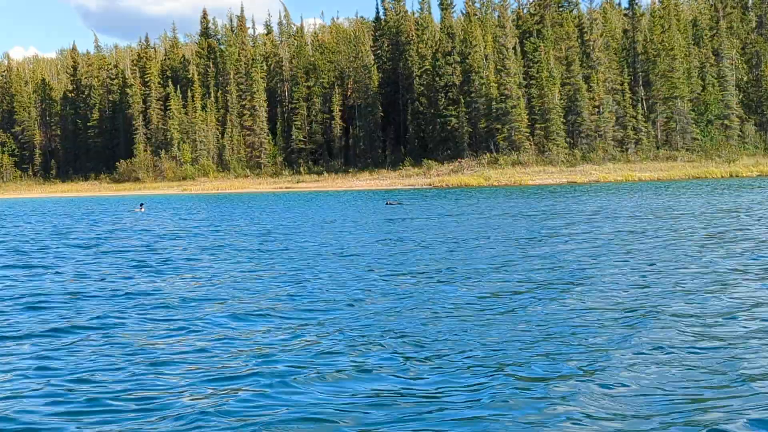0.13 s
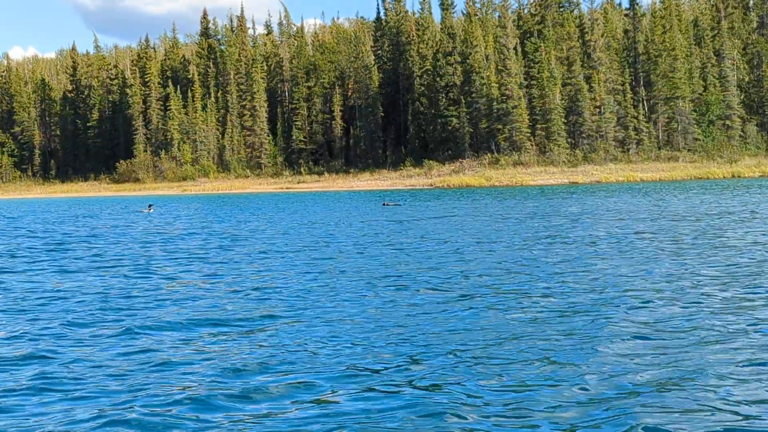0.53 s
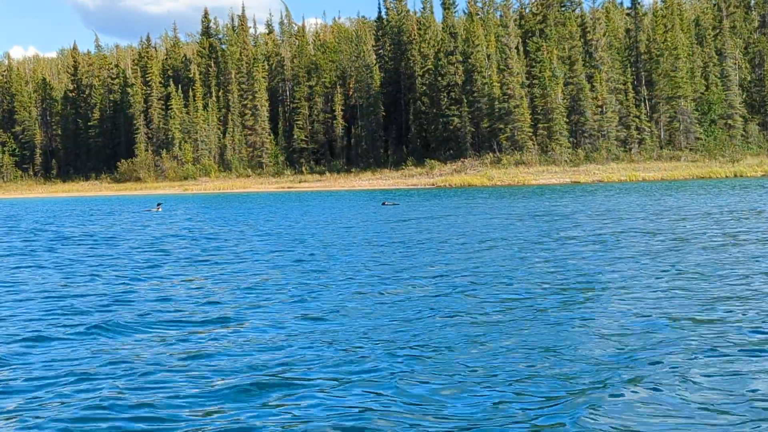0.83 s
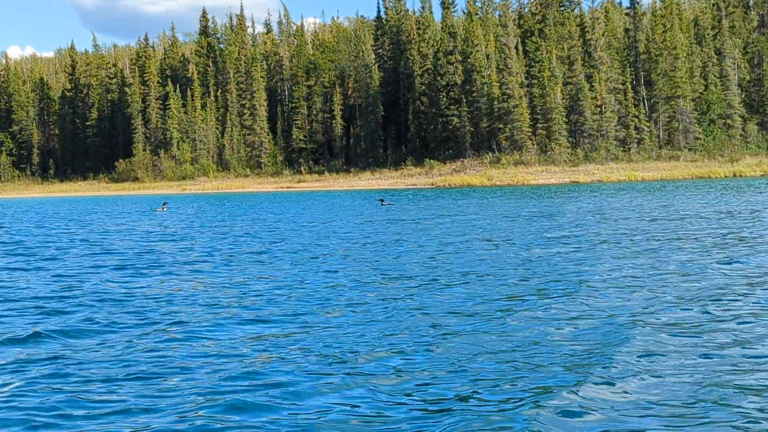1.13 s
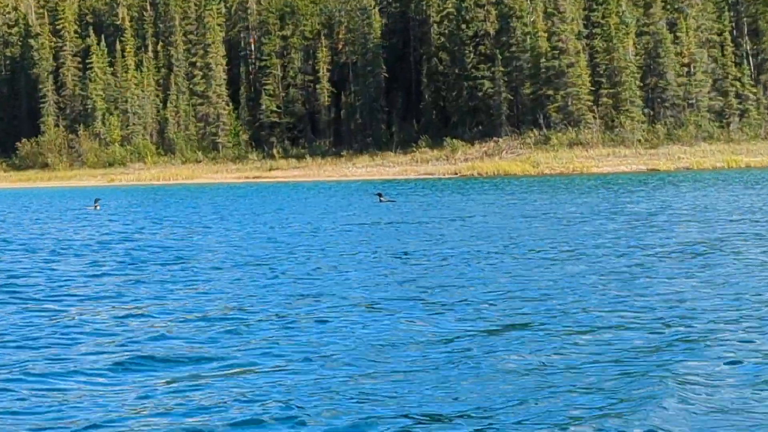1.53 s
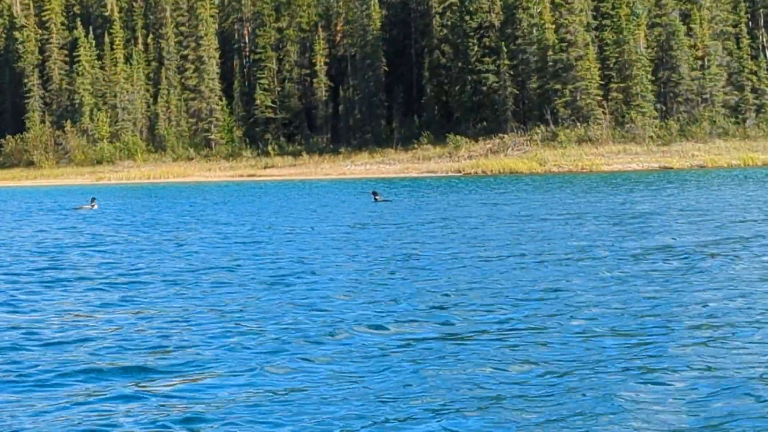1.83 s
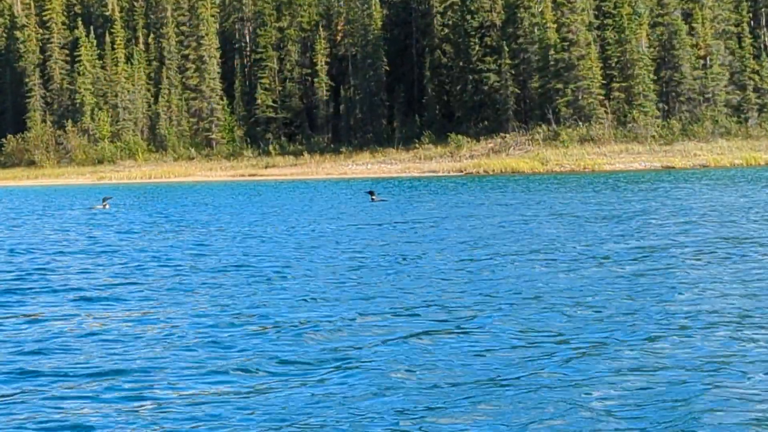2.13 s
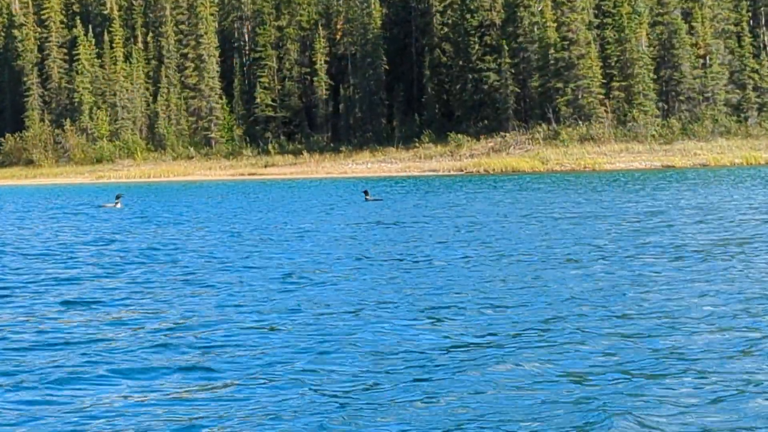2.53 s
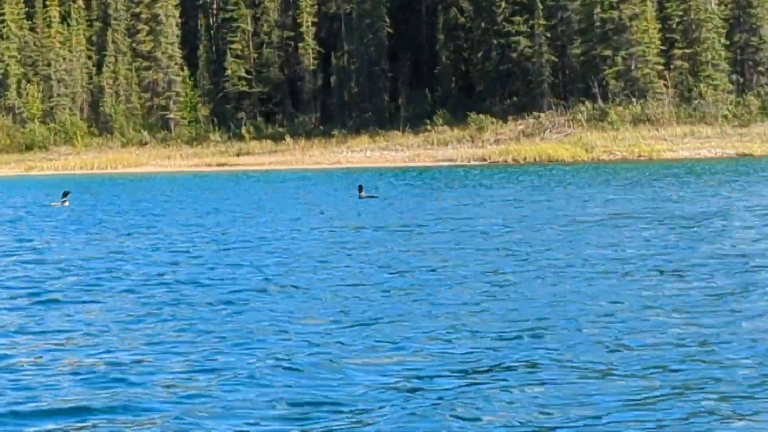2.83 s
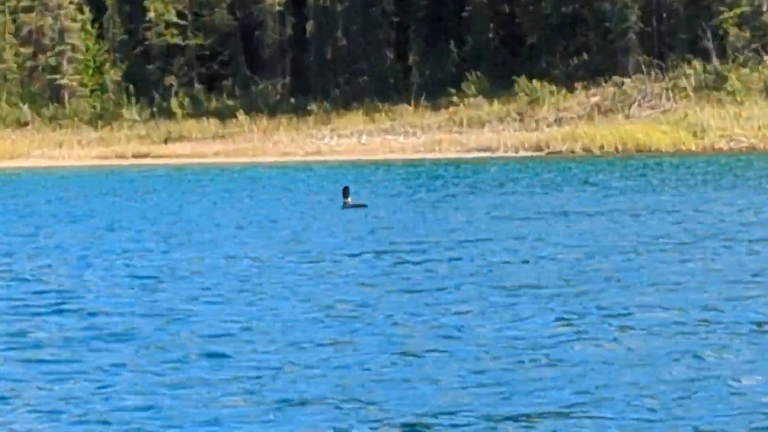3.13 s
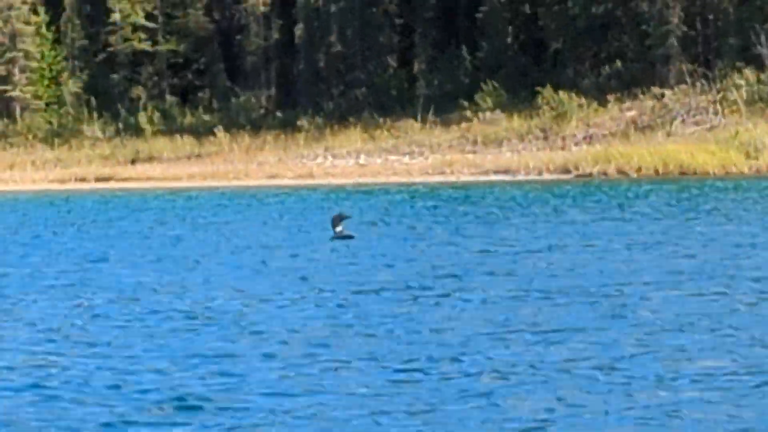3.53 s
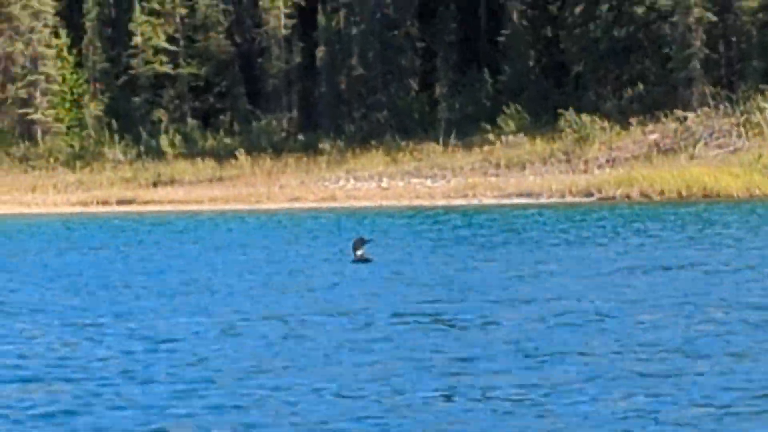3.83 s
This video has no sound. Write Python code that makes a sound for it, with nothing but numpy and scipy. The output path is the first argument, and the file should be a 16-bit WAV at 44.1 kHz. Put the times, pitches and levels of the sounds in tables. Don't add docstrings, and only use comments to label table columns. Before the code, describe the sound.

Loon tremolo calls, three quick quavering bursts, echo faintly from trees amid low wind thumps and water plops.

```python
import sys
import numpy as np
from scipy import signal
from scipy.fft import rfft, irfft
from scipy.io import wavfile

SR = 44100
rng = np.random.default_rng(int(sys.argv[2]) if len(sys.argv) > 2 else 0)


def attenuation_scalar(level_db):
    decades = np.asarray(level_db, float) / 20
    return 10 ** decades


def transcribe(u):
    v = np.clip(np.atleast_2d(u).T, -1, 1)
    q = np.round(v * 32767).astype(np.int16)
    wavfile.write(sys.argv[1], SR, q)


N = 176400

# t/s, left level/dB, right level/dB
BREEZE = [(0, -46, -33.5), (.7, -45, -49), (1.2, -50.5, -59.5), (1.5, -50.5, -57), (1.85, -55, -37),
          (2.15, -44, -50), (2.6, -51.5, -56), (3.1, -45, -33.5), (3.5, -44, -51), (4, -48, -39)]
# f/Hz, density/dB per Hz
BREEZE_SPECTRUM = [(22, -31.5), (55, -5.5), (110, -1), (200, -7), (350, -22), (700, -41.5), (2500, -75.5)]
# start t/s, end t/s, level/dB
LEFT_GUSTS = [(.165, .2, -36), (.705, .76, -37.5), (1.0, 1.15, -45), (1.33, 1.4, -51.5), (1.5, 1.62, -48.5),
              (2.1, 2.3, -66), (2.6, 2.7, -45.5), (3.105, 3.14, -40), (3.24, 3.35, -41.5),
              (3.52, 3.8, -37.5), (3.86, 3.92, -39.5)]
RIGHT_GUSTS = [(0.015, 0.1, -32), (0.126, 0.192, -40.5), (0.285, 0.378, -30.5), (0.413, 0.514, -31.5),
               (0.512, 0.674, -44), (1.661, 1.778, -40), (1.771, 1.945, -37.5), (1.939, 1.994, -45),
               (2.928, 3.063, -44.5), (3.092, 3.196, -33.5), (3.19, 3.276, -38.5), (3.317, 3.385, -43.5),
               (3.582, 3.768, -43), (3.728, 3.941, -34.5), (3.943, 4.01, -36)]
# f/Hz, density/dB per Hz
GUST_SPECTRUM = [(15, -30), (25, -4.5), (86, 1), (337, -4), (687, -20.5), (1180, -34.5), (2500, -65.5),
                 (3250, -84), (5500, -120)]
# t/s, peak level/dB
LEFT_SLAPS = [(0.178, -41), (0.192, -39), (0.491, -38.5), (0.611, -41.5), (0.712, -33.5), (0.73, -38),
              (3.123, -42.5), (3.25, -39.5), (3.273, -37.5), (3.315, -40.5), (3.345, -37), (3.438, -41.5),
              (3.496, -43.5), (3.541, -34), (3.57, -35.5), (3.627, -41.5), (3.641, -34.5), (3.746, -37),
              (3.763, -40), (3.78, -40.5), (3.882, -33.5), (3.905, -38)]
RIGHT_SLAPS = [(0.036, -24), (0.06, -27), (0.091, -34.5), (0.171, -25), (0.185, -34.5), (0.3, -33),
               (0.322, -24), (0.353, -26.5), (0.427, -29.5), (0.442, -30.5), (0.455, -26), (0.468, -33),
               (0.477, -34), (0.498, -31), (1.869, -34), (1.881, -35.5), (1.937, -34.5), (3.097, -36),
               (3.108, -35.5), (3.118, -38), (3.128, -30.5), (3.137, -30.5), (3.149, -24), (3.169, -25),
               (3.181, -34.5), (3.204, -32), (3.733, -34), (3.75, -31.5), (3.767, -33), (3.785, -34),
               (3.849, -32.5), (3.869, -32.5), (3.884, -31.5), (3.927, -30)]
# f/Hz, density/dB per Hz
SLAP_SPECTRUM = [(40, -20.5), (120, -4), (300, 0), (600, -14), (1200, -36), (2500, -62.5), (5000, -100)]
# t/s, level/dB
WASH_LEVEL = [(0, -88), (.5, -84), (.6, -78), (.75, -81.5), (.85, -86), (1.7, -82.5), (2.6, -80.5),
              (3.4, -78.5), (4, -86)]
# f/Hz, density/dB per Hz
WASH_SPECTRUM = [(500, -11.5), (1200, -20), (2000, -10.5), (4500, -19.5), (6200, -19), (7500, -22.5),
                 (12000, -27), (15700, -31)]
# t/s, f/Hz, level/dB, relative pitch rise/(1/s)
PLOPS = [(.565, 1086, -69.5, -1.5), (.625, 2260, -74.5, 1.3), (0.627, 1710, -78, .5), (.645, 822, -76, .5),
         (.72, 1423, -81, 0), (.6, 1067, -79, 0.5), (.628, 2650, -79, 0), (.655, 1440, -82, 0.5),
         (.9, 1143, -76.5, -0.5), (.9, 640, -68, 1.5), (1.175, 1770, -68, -3.5), (.876, 1166, -68, -1.5),
         (.878, 593, -63, 2.5), (1.008, 1060, -76, 8.5), (1.025, 800, -73, 7), (1.085, 1160, -84, 10.5),
         (2.488, 1810, -64, 0), (3.189, 1995, -72, 5), (3.415, 2210, -68.5, 5), (3.416, 1720, -74.5, 3.5)]
# start t/s, end t/s, level/dB
FIZZES = [
    (0.227, .29, -81),
    (0.562, 0.673, -80),
    (0.661, .74, -80.5),
    (.74, .82, -86.5),
    (3.34, 3.36, -89),
    (3.433, 3.46, -87),
    (3.536, 3.62, -88.5),
]
# f/Hz, density/dB per Hz
FIZZ_SPECTRUM = [(3000, -16), (4800, -15), (6200, 3), (7200, -5), (10000, -7), (11500, -2), (12500, -9),
                 (15700, -15)]
# f/Hz, density/dB per Hz
SCRATCH_SPECTRUM = [(880, -40), (1500, -13), (1810, -9), (2230, -13), (2800, -14.5), (4590, -17),
                    (6630, -11), (11300, -5.5), (14000, -2.5), (16000, -7.5)]
# crest t/s, top f/Hz, level/dB, split lines level/dB
THROBS = [(1.137, 756, -50, -59.5), (1.243, 856, -39, -60.5), (1.239, 1190, -39.5, -27.5),
          (1.34, 1230, -31.5, -29.5), (1.444, 1170, -34, -58.5), (1.538, 632, -61.5, -72),
          (1.788, 787.5, -50, -57.5), (1.886, 924, -37, -64), (1.878, 1290, -34, -20),
          (1.982, 1290, -33, -65.5), (2.086, 1288, -32.5, -64.5), (2.196, 792.5, -47.5, -62),
          (2.544, 767.4, -45, -57), (2.626, 880, -33.5, -72), (2.633, 1220, -32.5, -18.5),
          (2.726, 1253, -27.5, -24), (2.825, 1223, -27.5, -23), (2.93, 1118, -34.5, -56),
          (2.999, 648, -57.5, -52)]
# start t/s, end t/s, f between throbs/Hz, overtones level/dB, throat peak f/Hz
PHRASES = [
    (1.094, 1.24, 661.5, -3, 4270),
    (1.239, 1.517, 943, -1.1, 4170),
    (1.506, 1.628, 624, -8, 4600),
    (1.763, 1.882, 675, 7, 5920),
    (1.879, 2.164, 978, 4.5, 6220),
    (2.162, 2.265, 654, 4, 5700),
    (2.507, 2.614, 675, -2, 4300),
    (2.612, 2.999, 952.5, 5.5, 4440),
    (2.981, 3.016, 621, -11.5, 4600),
]
HEAD_PARTIALS_DB = [1.5, -26.5]
CHEST_PARTIALS_DB = [0, 4, -17.5]
# thirds of the pitch, level/dB
SPLIT_LINES = [(2, -0.5), (4, 0.5), (5, 2), (11, -18)]
# f/Hz, level/dB
AIR_SPECTRUM = [(1500, 4.5), (3000, 2), (5000, -5.5), (7500, -12.5), (14000, -15.5), (15700, -18.5),
                (15900, -61.5)]
# f/Hz, width/Hz, depth/dB
THROAT_DIPS = [(1900, 61, 2), (3100, 390, 11.5)]

TIME_S = np.arange(N) / SR
BINS_HZ = np.arange(N // 2 + 1) * SR / N
SIDES = np.array([[.5], [-.5]])


def rms_one(x):
    return x / np.sqrt(np.mean(x ** 2) + 1e-20)


def in_time(rows):
    s, *columns = np.transpose(rows)
    return [np.interp(TIME_S, s, c) for c in columns]


def colour(x, points):
    hz, db = np.transpose(points)
    gain_db = np.interp(np.log(BINS_HZ + 1), np.log(hz), db)
    return rms_one(irfft(rfft(x) * attenuation_scalar(gain_db), N))


def drift(rate_hz, channels=1):
    r = np.exp(-2 * np.pi * rate_hz / SR)
    noise = rng.standard_normal((channels, N + SR))
    return rms_one(signal.lfilter([1], [1, -2 * r, r * r], noise)[:, SR:])


def grains(per_s, spread_db, channels=1):
    shape = (channels, N)
    hit = rng.random(shape) < per_s / SR
    size = attenuation_scalar(spread_db * np.minimum(rng.exponential(1, shape), 4))
    return hit * size * rng.choice([-1, 1], shape)


def bump(t, width_s):
    return .5 + .5 * np.cos(2 * np.pi * np.clip(t / width_s, -.5, .5))


def gate(t, start, end, edge_s):
    return np.clip(np.minimum(t - start, end - t) / edge_s + .5, 0, 1) ** 2


def wind():
    edge_s, full_db, lump_share = 0.014, -29, 0.69
    gust = np.array([sum(attenuation_scalar(db) * gate(TIME_S, s, end, edge_s) for s, end, db in side)
                     for side in (LEFT_GUSTS, RIGHT_GUSTS)])
    full = np.clip(gust / attenuation_scalar(full_db), 0, 1) ** 0.45
    dull = colour(rng.standard_normal((2, N)), BREEZE_SPECTRUM)
    lumps = rms_one(grains(220, 4.0, channels=2))
    rough = lump_share * lumps + np.sqrt(1 - lump_share ** 2) * rng.standard_normal((2, N))
    bright = colour(rough, GUST_SPECTRUM + [(6000, -150)])
    flicker = attenuation_scalar(4 * drift(14.1, channels=2) - 2.0)
    weak = flicker * (attenuation_scalar(in_time(BREEZE)) + gust * (1 - full)) * dull
    strong = np.sqrt(flicker) * attenuation_scalar(-3.5) * gust * full * bright
    return weak + strong


def slaps():
    level_db, rebound = 4.5, 0.56
    sharp_s, sharp_db, sharp_hz, sharp_t60_s = 3.902, -28, 800, 0.023
    out = np.zeros((2, N))
    for port, rows in enumerate((LEFT_SLAPS, RIGHT_SLAPS)):
        for (s, db), (chance, late) in zip(rows, rng.random((len(rows), 2))):
            peak = attenuation_scalar(db) * np.sign(chance - .5)
            out[port, int(s * SR)] += peak
            out[port, int((s + .0015 + .003 * late) * SR)] -= rebound * peak
    pulse = colour(np.arange(N) == 0, SLAP_SPECTRUM)
    out = attenuation_scalar(level_db) * irfft(rfft(out) * rfft(pulse / pulse[0]), N)
    t = np.maximum(TIME_S - sharp_s, 0)
    ring = attenuation_scalar(sharp_db - 60 * t / sharp_t60_s) * np.sin(2 * np.pi * sharp_hz * t)
    out[1] += ring * np.clip(t / 0.00045, 0, 1)
    return out


def water():
    plop_s, rough_db = 0.031, 5
    db, = in_time(WASH_LEVEL)
    wash = colour(rng.standard_normal((2, N)), [(200, -30)] + WASH_SPECTRUM + [(15900, -70)])
    out = attenuation_scalar(db + 1.5 * drift(8, channels=2)) * wash
    rough = attenuation_scalar(rough_db * drift(180)[0])
    t = np.arange(int(plop_s * SR)) / SR
    shape = bump(t - plop_s / 2, plop_s) ** 0.31
    for s, hz, level_db, rise_per_s in PLOPS:
        i = int(s * SR) + np.arange(len(t))
        phase = 2 * np.pi * np.cumsum(hz * (1 + rise_per_s * t)) / SR
        out[:, i] += attenuation_scalar(level_db) * shape * rough[i - int(hz)] * np.sin(phase)
    return out


def fizz():
    clumped = grains(3000, 4.0, channels=2) * attenuation_scalar(2.1 * drift(61))
    spray = colour(clumped, [(1500, -37)] + FIZZ_SPECTRUM + [(15900, -47)])
    return sum(attenuation_scalar(db) * gate(TIME_S, s, end, .02) for s, end, db in FIZZES) * spray


def scratch():
    start_s, end_s, edge_s, level_db = 0.292, .33, 0.014, -49
    tick_s, tick_db = .307, 28.5
    pan_db, pan_peak_hz, pan_width, turn_rad = 8, 8460, .6, 1.4
    rub = rms_one(grains(6200, 4.2)[0] * attenuation_scalar(2.0 * drift(150)[0]))
    rub[int(tick_s * SR)] += attenuation_scalar(tick_db)
    rub = colour(rub, [(500, -40)] + SCRATCH_SPECTRUM)
    rub = attenuation_scalar(level_db) * gate(TIME_S, start_s, end_s, edge_s) * rub
    bin_pan_db = pan_db * np.exp(-(np.log((BINS_HZ + 1) / pan_peak_hz) / pan_width) ** 2)
    return irfft(rfft(rub) * attenuation_scalar(SIDES * bin_pan_db) * np.exp(1j * SIDES * turn_rad), N)


def tree_line(voice):
    level_db, t60_s, wait_s, rise_s, cut_hz = -31, 4.37, .05, 0.19, 11000
    past = np.concatenate([voice[int(2.4 * SR):], voice])
    t = np.maximum(TIME_S - wait_s, 0)
    shape = (1 - np.exp(-t / rise_s)) * attenuation_scalar(-60 * t / t60_s)
    trunks = signal.lfilter(*signal.butter(1, cut_hz, fs=SR), rng.standard_normal((2, N))) * shape
    trunks /= np.sqrt(np.sum(trunks ** 2) / 2 * SR / (np.pi * cut_hz))
    return attenuation_scalar(level_db) * signal.fftconvolve(past[None], trunks)[:, len(past) - N:len(past)]


def ripples(voice):
    level_db, t60_s = -28, 0.27
    t = np.arange(SR // 2) / SR
    smear = rng.standard_normal((2, len(t))) * attenuation_scalar(-60 * t / t60_s) * np.clip(t / .01, 0, 1)
    smear /= np.sqrt(np.sum(smear ** 2) / 2)
    return attenuation_scalar(level_db) * signal.fftconvolve(voice[None], smear)[:, :N]


def swallowed(hz):
    return attenuation_scalar(-sum(db / (1 + ((hz - dip_hz) / width_hz) ** 4) for dip_hz, width_hz, db in THROAT_DIPS))


def throat(hz, peak_hz, head):
    peak = 1 / (1 + ((hz - peak_hz) / 330) ** 2)
    if peak_hz > 5200:
        second = attenuation_scalar(-6.5 + 11.5 * head) / (1 + ((hz - 4020) / 550) ** 4)
        peak = peak + second + attenuation_scalar(-18.5) / (1 + (hz / 8000) ** 6)
    return peak * swallowed(hz)


def loon():
    break_hz = 1000
    throb_s, level_lag_s, split_lag_s, split_s = .102, 0.0014, 0.0084, 0.066
    edge_s, onset_s, release_s = 0.0035, 0.027, 0.025
    sag_hz_per_s, fade_db_per_s, wobble_db, wobble_hz = 130, 40, 1, 7.4
    head_dip_db, chest_dip_db, overtone_dip_db, top_dip_db = 11, 15, 5, 1.5
    head_top_db, chest_top_db, patchy_db = -56, -34.5, 2.5
    first_head_db, later_db = -9.5, 7.5
    air_db = -52
    out, rows = np.zeros(N), np.array(THROBS)
    air = colour(rng.standard_normal(N), [(500, -36.5)] + AIR_SPECTRUM)
    wobble = drift(60, channels=2)
    for start, end, low_hz, over_db, throat_hz in PHRASES:
        head = low_hz > .82 * break_hz
        near = (rows[:, 0] > start - .03) & (rows[:, 0] < end + .03)
        mine = rows[near & ((rows[:, 1] > break_hz) == head)]
        crest, top_hz, db, split_db = mine.T[:, :, None]
        i = np.arange(int((start - .02) * SR), int((end + .02) * SR))
        t = i / SR

        rest_hz = low_hz - sag_hz_per_s * (t - (start + end) / 2)
        lift_hz = ((top_hz - rest_hz) * bump(t - crest, throb_s)).max(axis=0)
        hz = rest_hz + lift_hz + wobble_hz * wobble[0, i]
        phase = 2 * np.pi * np.cumsum(hz) / SR

        slack = 1 - bump(t - crest - level_lag_s, throb_s).max(axis=0)
        level = np.interp(t, crest[:, 0], db[:, 0]) + wobble_db * wobble[1, i]
        level = level - (head_dip_db if head else chest_dip_db) * slack ** 1.51
        level = level - fade_db_per_s * np.maximum(t - crest.max() - throb_s / 2, 0)

        over = attenuation_scalar(over_db - overtone_dip_db * slack)
        tone = np.zeros(len(t))
        for k, partial_db in enumerate(HEAD_PARTIALS_DB if head else CHEST_PARTIALS_DB, 1):
            gain = over * swallowed(k * hz) if k > 1 else 1
            tone += attenuation_scalar(partial_db) * gain * np.sin(k * phase)

        top_db = (head_top_db if head else chest_top_db) - top_dip_db * slack
        top_db = top_db + (later_db if start > 1.7 else first_head_db * head)
        for k in range(3 if head else 4, 12 if head else 17):
            patchy = attenuation_scalar(patchy_db * np.roll(wobble[0], 3000 * k)[i])
            tone += over * attenuation_scalar(top_db) * throat(k * hz, throat_hz, head) * patchy * np.sin(k * phase)

        split = (attenuation_scalar(split_db) * bump(t - crest - split_lag_s, split_s)).max(axis=0)
        for k, line_db in SPLIT_LINES:
            if k < 6 or start > 2.5:
                tone += split * attenuation_scalar(line_db) * np.sin(k * phase / 3)

        tone += attenuation_scalar(air_db + head_dip_db * slack) * over * air[i]
        attack = np.clip((t - start) / (edge_s if head else onset_s) + 0.2, 0, 1)
        release = np.clip((end - t) / release_s + 0.26, 0, 1)
        out[i] += np.sqrt(2) * attenuation_scalar(level) * gate(t, start, end, edge_s) * release * attack * tone
    return out


def ports(x, pan_db, lag_samples):
    lag_ends_hz = 2470
    lag_s = lag_samples / SR / (1 + (BINS_HZ / lag_ends_hz) ** 4)
    late = irfft(rfft(x) * np.exp(-2j * np.pi * BINS_HZ * lag_s), N)
    return np.array([x, late]) * attenuation_scalar(SIDES * pan_db)


def scene():
    voice = loon()
    background = wind() + slaps() + water() + fizz() + scratch()
    return background + tree_line(voice) + ripples(voice) + ports(voice, -0.3, 4)


def low_pass(x):
    return signal.sosfilt(signal.butter(12, 16460, fs=SR, output="sos"), x)


def record(dry):
    bass_cut_hz = 41
    high_pass = signal.butter(2, bass_cut_hz, "high", fs=SR, output="sos")
    mix = signal.sosfilt(high_pass, dry)
    return low_pass(mix)


dry = scene()
out = record(dry)
transcribe(out)
```